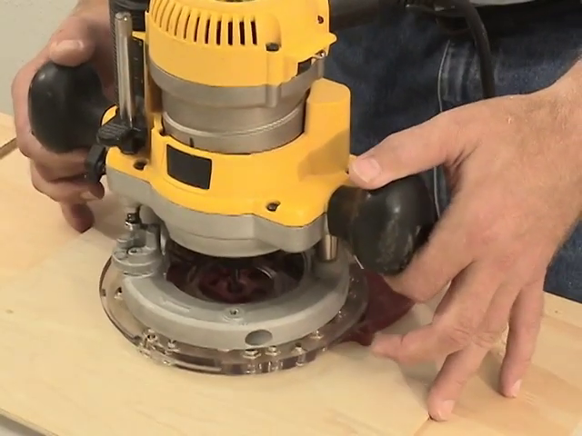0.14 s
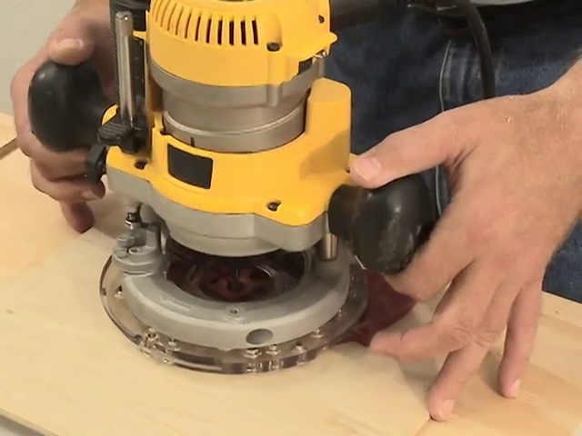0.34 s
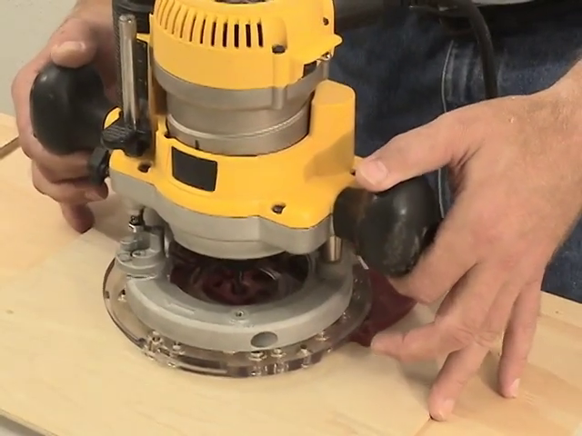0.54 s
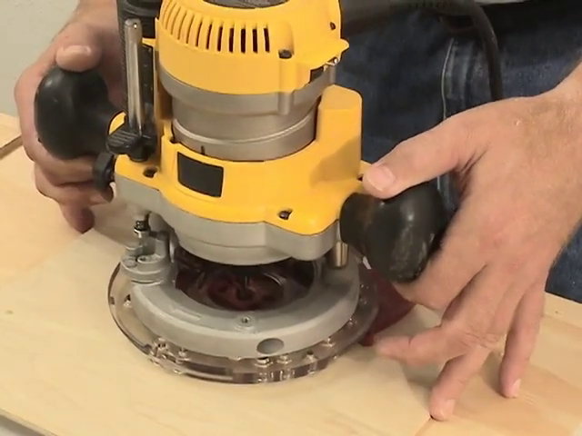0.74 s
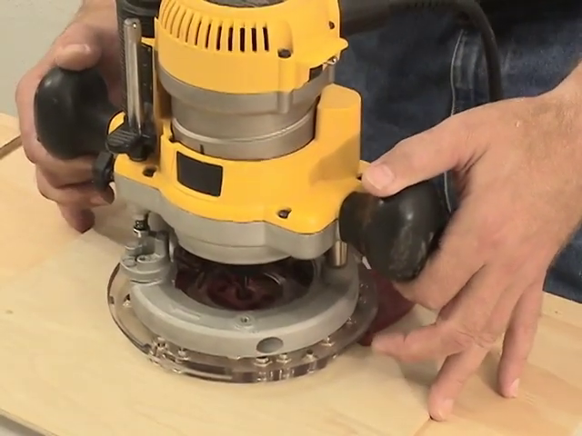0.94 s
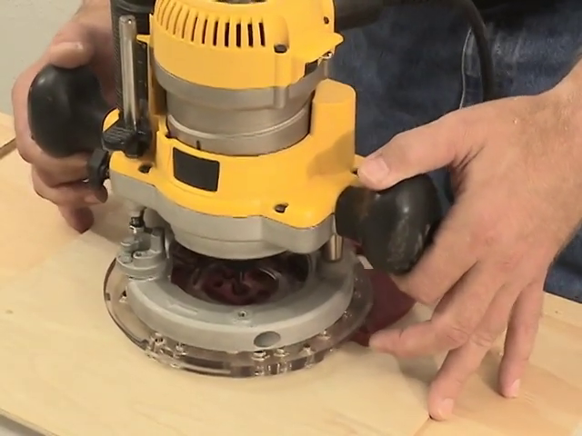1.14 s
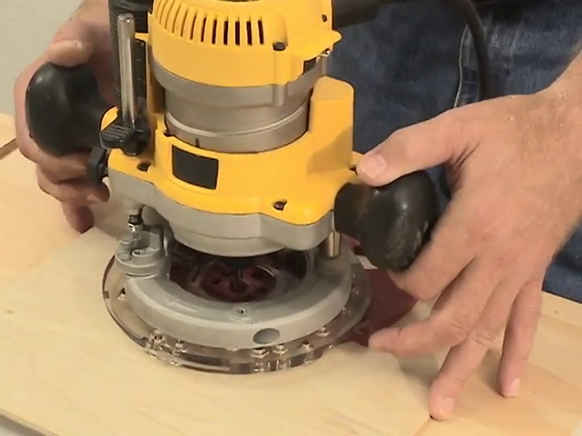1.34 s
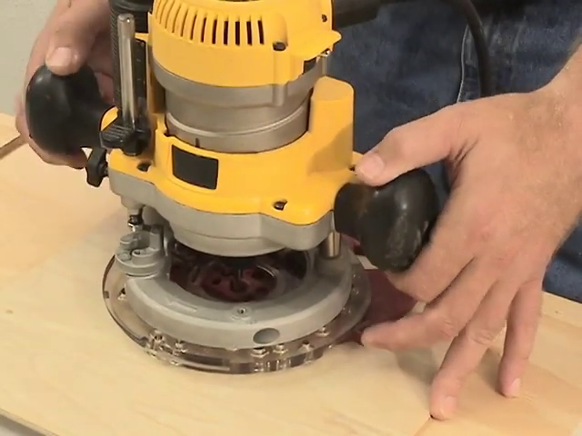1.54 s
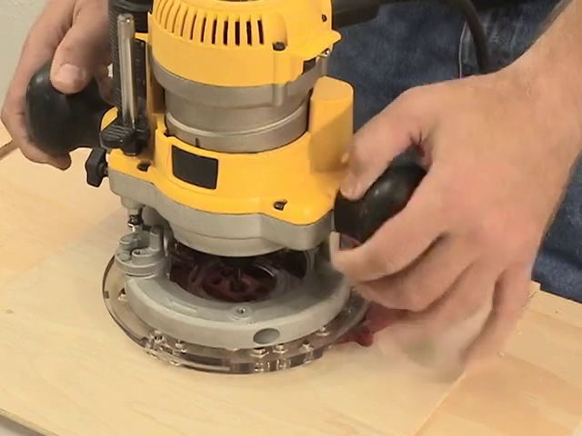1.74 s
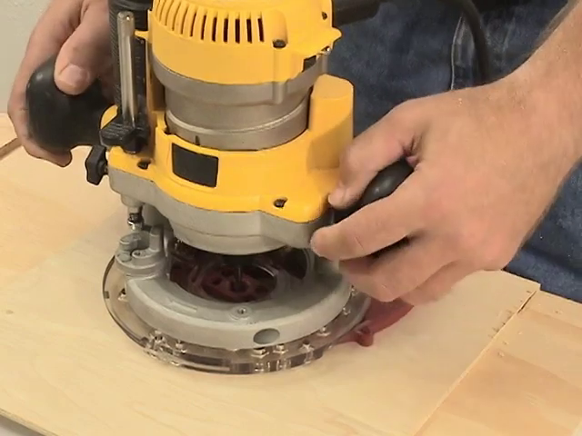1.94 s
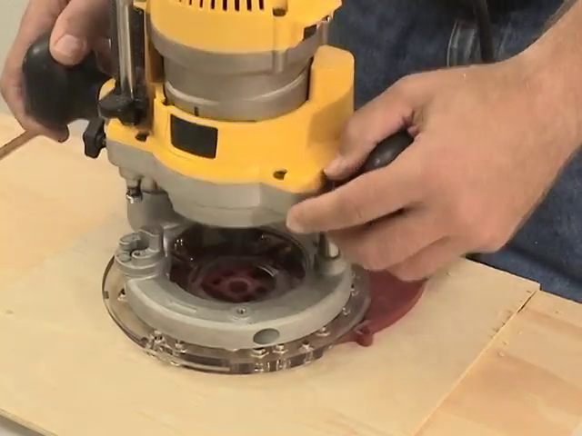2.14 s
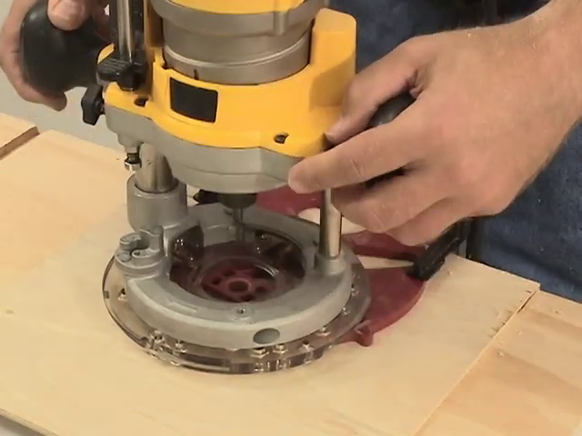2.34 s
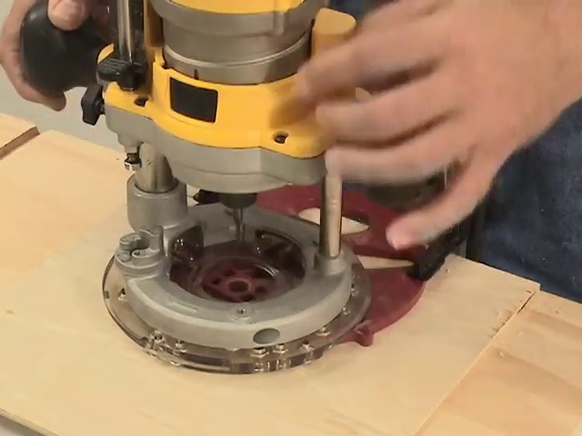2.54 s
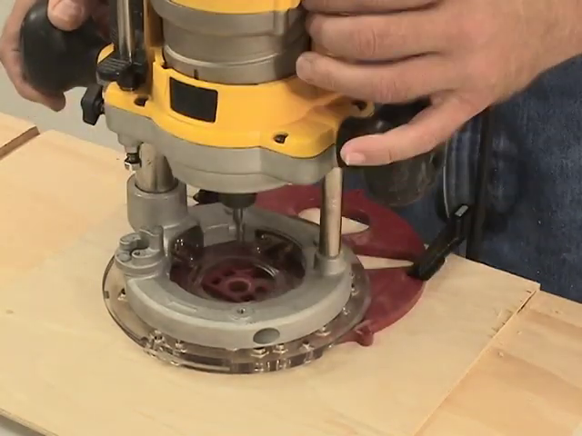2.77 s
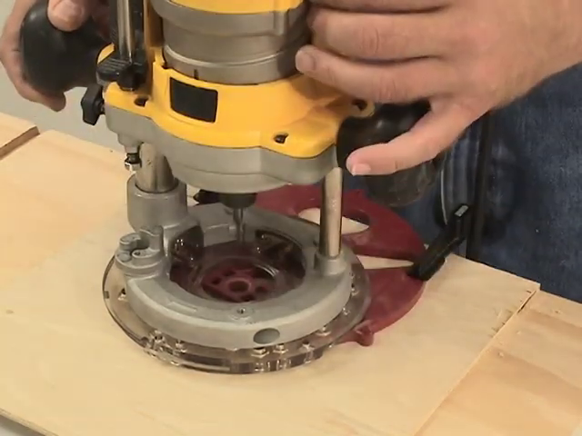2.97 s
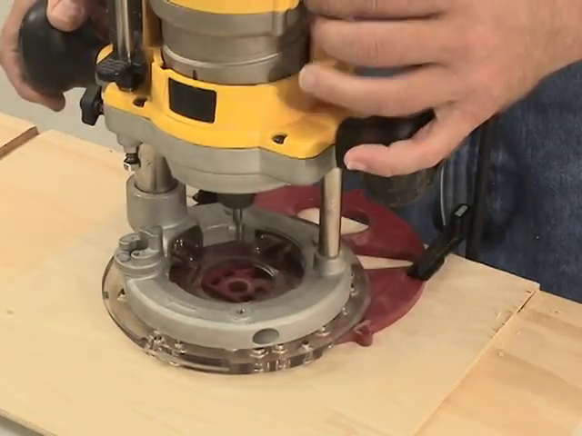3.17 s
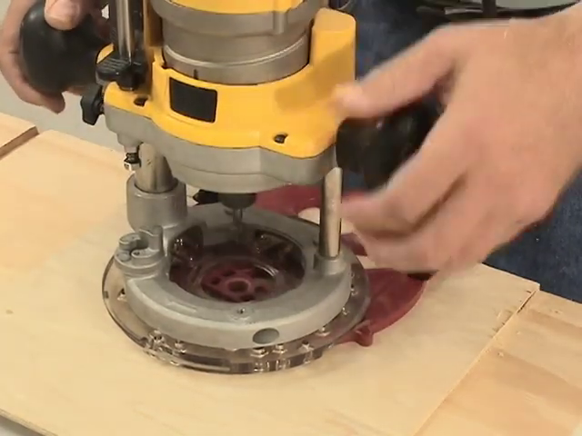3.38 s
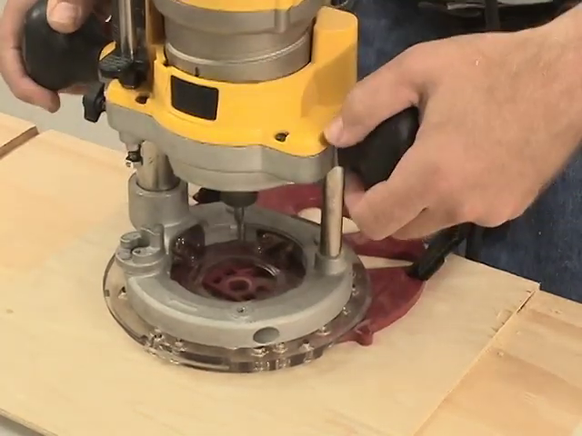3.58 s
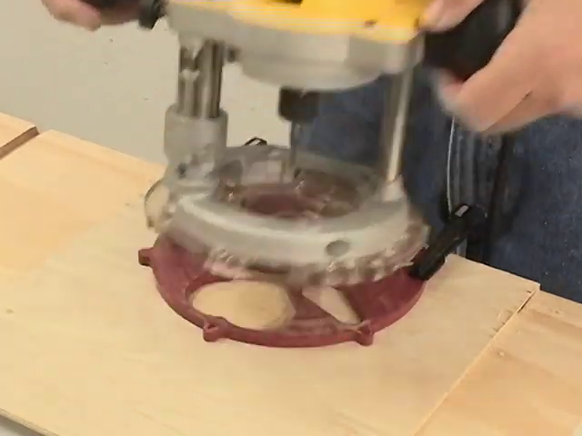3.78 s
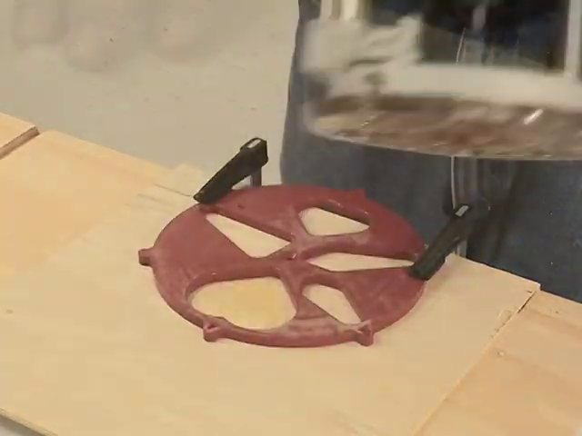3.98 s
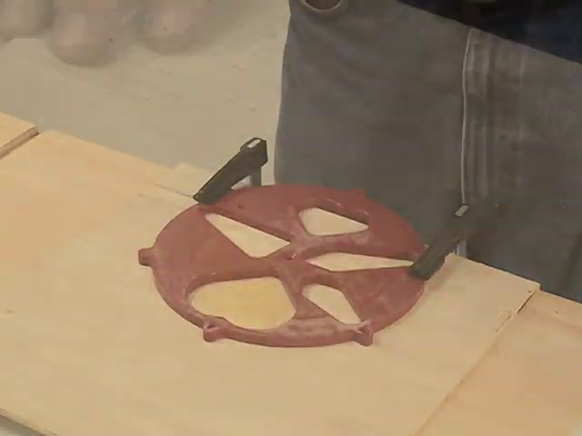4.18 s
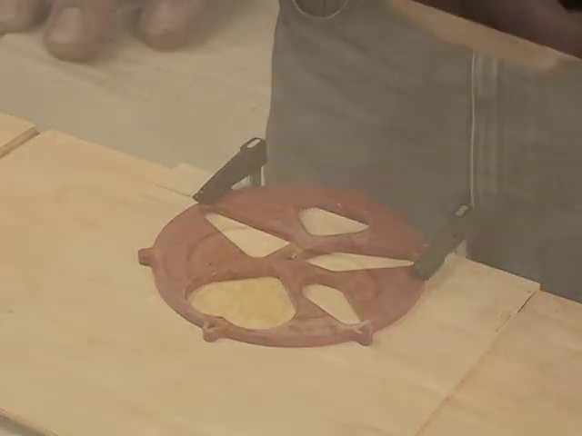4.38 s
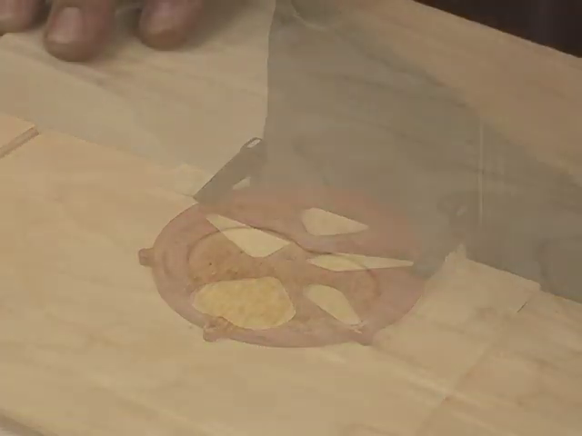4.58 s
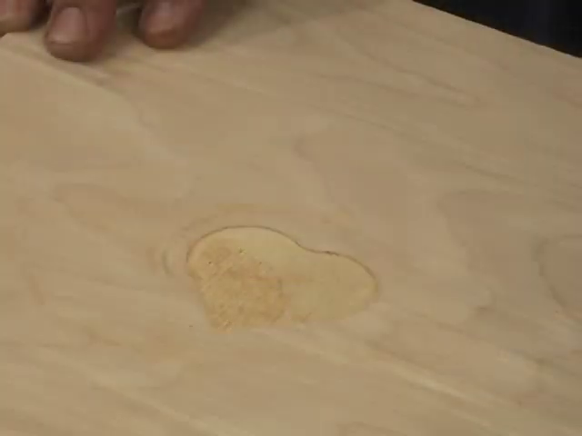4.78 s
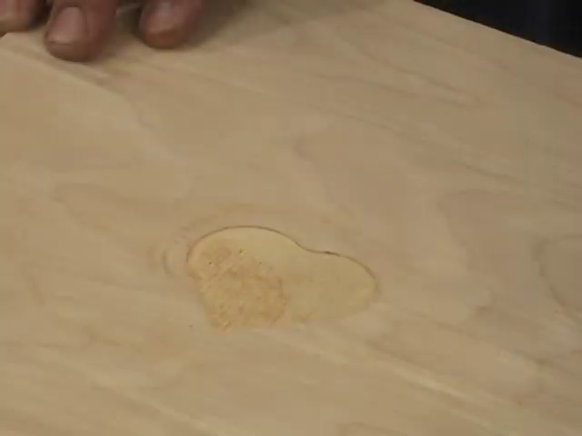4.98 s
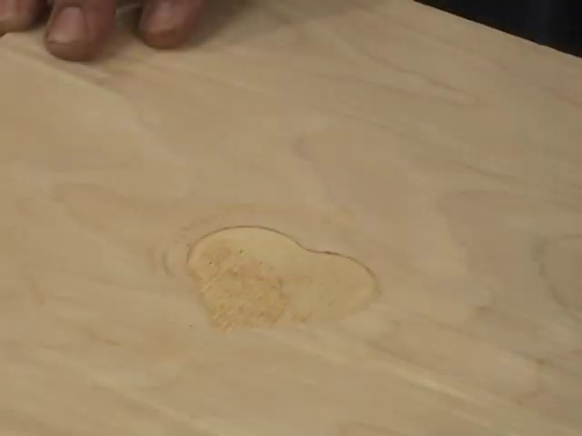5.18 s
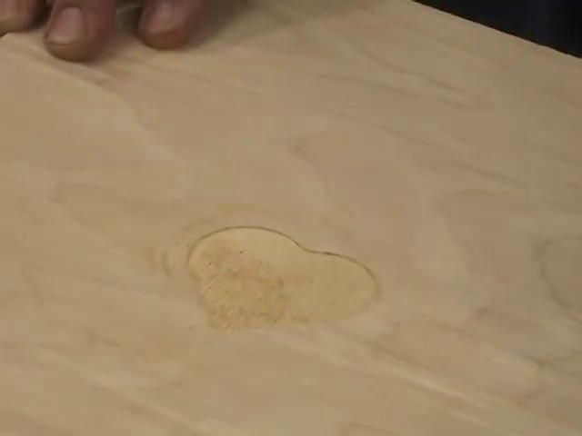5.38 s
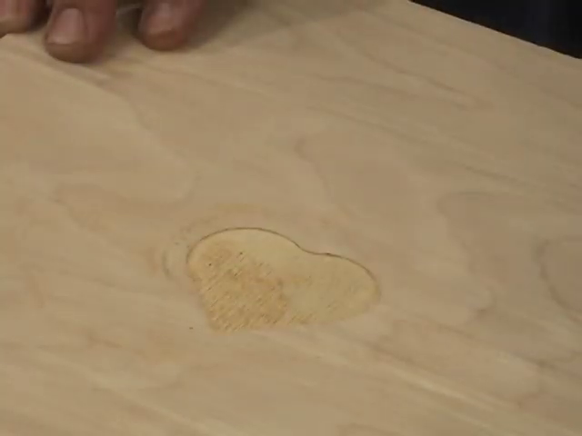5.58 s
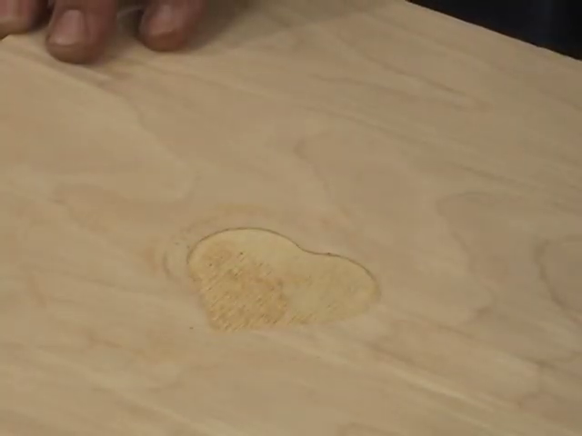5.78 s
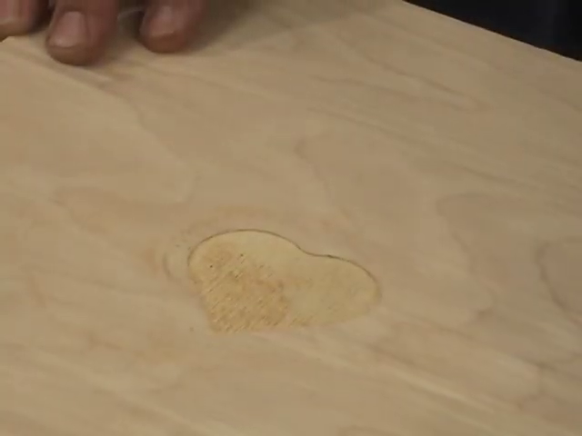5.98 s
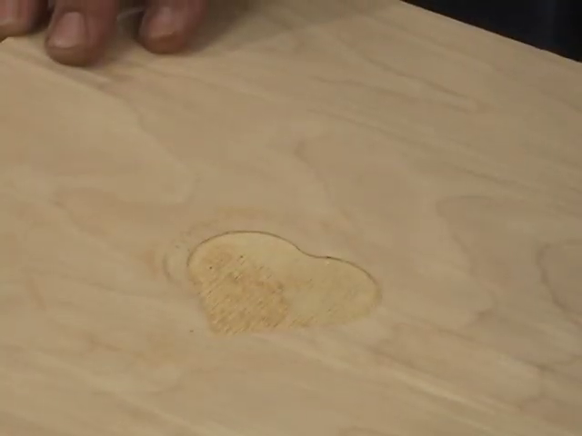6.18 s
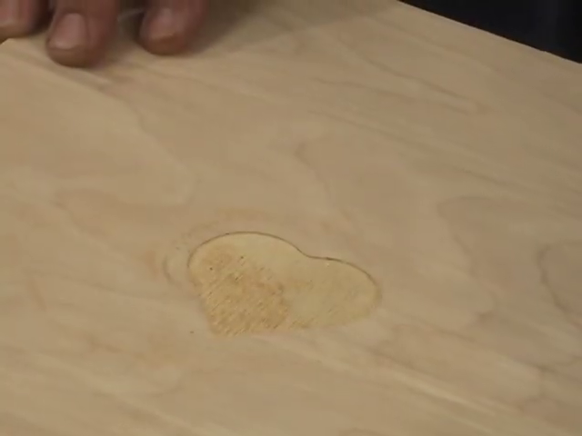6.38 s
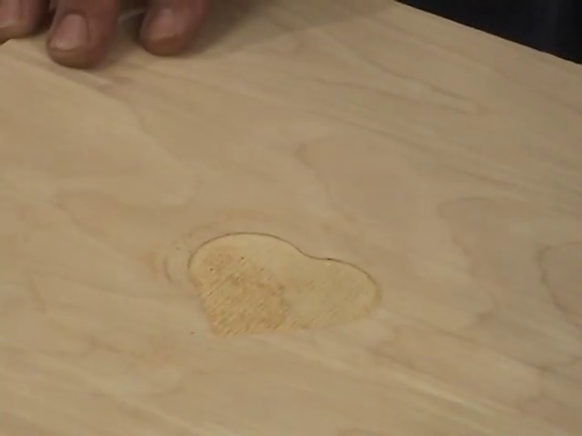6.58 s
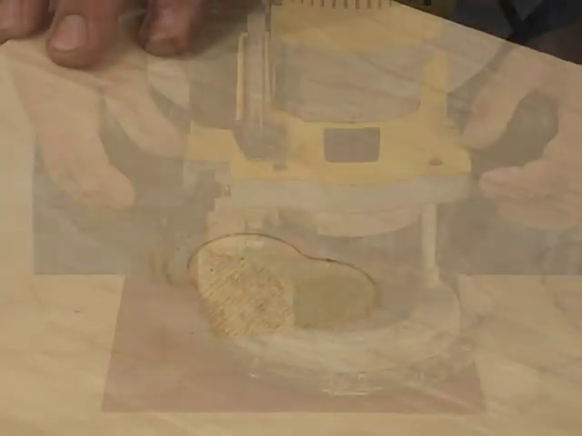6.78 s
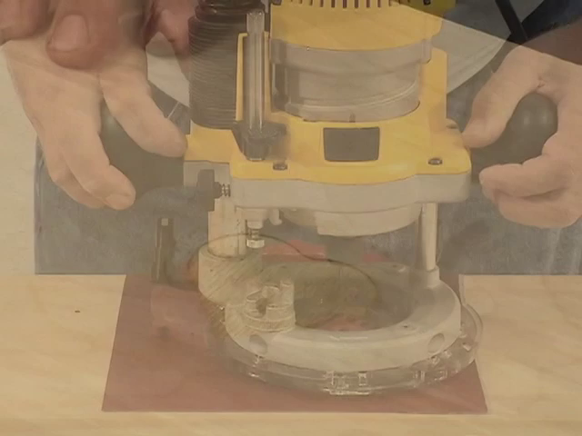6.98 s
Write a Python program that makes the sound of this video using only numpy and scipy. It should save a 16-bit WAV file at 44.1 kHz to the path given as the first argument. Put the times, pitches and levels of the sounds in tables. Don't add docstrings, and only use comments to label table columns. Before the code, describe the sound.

A steady, hissing electric motor roar fills the first three seconds, close to the microphone, with a thin tone beneath. Its colour opens when the machine is raised off the cut. Power stops, the tones glide down, and the roar hollows and vanishes just after four seconds. Quiet ventilation, mains hum and a very faint high whine follow, ended by a tiny scrape on wood.

```python
import sys
import numpy as np
from scipy import signal
from scipy.fft import rfft, irfft, next_fast_len
from scipy.io import wavfile
from scipy.ndimage import uniform_filter1d, map_coordinates

SR = 44100
rng = np.random.default_rng(int(sys.argv[2]) if len(sys.argv) > 2 else 0)


def inscribe(sig):
    pcm = np.round(np.clip(np.atleast_2d(sig).T, -1, 1) * 32767)
    wavfile.write(sys.argv[1], SR, pcm.astype(np.int16))


def volts(x):
    e = np.asarray(x, float) / 20
    return 10 ** e


N = 309580

SWITCH_OFF_S = 3.12
# (t/s, level/dB)
ROAR_LEVEL = [
    (0.0, -25),
    (2.07, -25),
    (2.22, -26),
    (3.33, -25.5),
    (3.64, -30.5),
    (3.82, -34.5),
    (4.0, -36.5),
    (4.23, -48),
    (4.33, -66),
]
# (t/s, 0 plunged / 1 raised / 2 lifted / 3 carried off)
HEIGHT_STAGES = [
    (0, 0),
    (2.1, 0),
    (2.21, 1),
    (3.6, 1),
    (3.77, 2),
    (3.88, 2),
    (3.98, 3),
    (4.4, 3),
]


def roar():
    # (f/Hz, level/dB per Hz)
    plunged_colour = [(150, -35), (330, -22.5), (640, -13), (1300, -11.5), (1830, -20.5), (2250, -11.5),
                      (2850, -7.5), (3150, -10.5), (4050, -11), (5000, -8.5), (6250, -0.5), (7100, -6),
                      (8300, -9), (10000, -19.5)]
    raised_colour = [(150, -31.5), (330, -23), (700, -12.5), (1200, -12.5), (1600, -18), (2200, -8.5),
                     (3250, -11), (3600, -6), (4300, -5.5), (5300, -7), (5800, -1.5), (7600, -2.5),
                     (9200, -11.5), (10000, -18.5)]
    lifted_colour = [(150, -37), (400, -16), (718, -7.5), (955, -10), (1340, -6), (1880, -10.5),
                     (2590, -6.5), (4470, -1.5), (5720, -4), (6860, -1.5), (7800, -5.5), (10000, -16)]
    away_colour = [(150, -28), (450, -11), (980, -8.5), (1270, -5.5), (1600, -10), (2220, -5), (2900, -3.5),
                   (4470, 0.5), (5720, -5.5), (6780, -5), (8000, -7.5), (10000, -15)]
    # (f/Hz, level/dB per Hz)
    hiss_colour = [(8500, -37), (9900, -11), (10500, 3), (12000, 0.5), (13200, 3), (14000, 0), (14700, -4),
                   (15300, -13), (15480, -18), (15620, -12), (15750, -22)]
    # (f/Hz, likeness 0-1, left minus right/dB, left leads/rad)
    machine_ports = [(300, .95, -3.4, .3), (1000, .87, -2, .4), (1900, .94, -.9, .1), (4000, .92, -1.3, .1),
                     (6200, .96, -2.9, .2), (7200, .89, -3.6, .2), (8600, .67, -3.2, 1.2),
                     (9300, .77, 0, 1.7), (10000, .6, 4.5, 2.2), (10700, .14, 9.3, 3), (11400, .32, 8, 4.9),
                     (12200, .45, 2, 5.1), (13800, .74, -2.1, 5.8), (15300, .97, -.2, 6.3)]
    # (t/s, delay/ms, strength 0-1)
    bench_echo = [
        (0, 0.53, 0.02),
        (3.62, 0.56, 0.02),
        (3.78, 0.72, 0.35),
        (4.05, .86, 0.3),
        (4.4, 1.12, 0),
    ]
    bench_coupling = (.93, .45, .3, .3)

    level_db, = curves(ROAR_LEVEL)
    height, = curves(HEIGHT_STAGES)
    end = round(ROAR_LEVEL[-1][0] * SR)
    air = 0
    for stage, colour in enumerate((plunged_colour, raised_colour, lifted_colour, away_colour)):
        share = np.sqrt(np.clip(1 - abs(height - stage), 0, 1))
        heard = np.flatnonzero(share)
        delays_s = rng.uniform(.004, .03, size=6)

        def response(hz):
            walls = 1 + 0.084 * np.exp(-2j * np.pi * np.outer(hz, delays_s)).sum(1)
            return closed(colour, hz) * ringing(hz, bench_coupling[stage]) * walls

        air = air + share * rush(response, machine_ports, patchy_db=0.84,
                                 start=heard[0], stop=min(heard[-1], end))

    body = filtered(air, lambda hz: 1 / (1 + (hz / 3300) ** 8))
    delay_ms, strength = curves(bench_echo)
    late = np.arange(N) - delay_ms * SR / 1000
    air = air + strength * np.array([np.interp(late, np.arange(N), low) for low in body])

    hiss = rush(lambda hz: closed(hiss_colour, hz), machine_ports, patchy_db=.5, stop=end)
    hiss_db = -22.0 - 2.8 * np.clip(height - 1, 0, 1)
    return volts(level_db + 0.2 * wobble(7.6)) * (air + volts(hiss_db) * hiss)


def ringing(hz, coupling):
    # (f/Hz, level/dB)
    bench_modes = [(525, -6), (607, -1), (690, 13.5), (762, 9.5), (845, 11), (930, 6.5), (998, 4.5),
                   (1105, 5), (1190, -27), (1246, -15), (1295, -0.5), (1400, 1.5), (1475, -2), (1560, 9.5),
                   (1660, 1), (1730, 6), (1850, -25), (1925, -10), (2245, -7.5), (2385, -13), (2880, -3),
                   (2968, -6), (3265, -21), (3645, -2.5), (4346, -2)]
    width_hz = 32
    peaks = 1 + sum(coupling * volts(db) / (1 + (2 * (hz - c) / width_hz) ** 2) for c, db in bench_modes)
    return peaks / uniform_filter1d(peaks, size=len(hz) // 60)


def whine():
    faint_orders = {18: (-28, .3), 24: (-38, 1), 29: (-45, 2.9)}
    # (from t/s, to t/s, gain/dB)
    grip_leans = [
        (.28, .42, 2.5),
        (.82, 0.998, 1.5),
        (1.324, 1.93, 3.5),
        (2.36, 3.176, 4.5),
        (3.38, 3.6, 1.5),
    ]
    blades = 19
    shaft_under_db, lift_loss_db, lean_ramp_s = -20, -16, .1

    turns = 2 * np.pi * np.cumsum(speed() + .1 * wobble(12)) / SR
    level_db, = curves(ROAR_LEVEL)
    lifted = np.clip(curves(HEIGHT_STAGES)[0] - 1, 0, 1)
    side = np.array([[1], [-1]])

    lean_db = sum(db * span(a, b, lean_ramp_s) for a, b, db in grip_leans)
    shaft_db = level_db + shaft_under_db + lift_loss_db * lifted + lean_db
    shaft = volts(shaft_db + 0.5 * wobble(24.6) - 1.76 * side) * np.sin(turns + .13 * side)

    blade_gain = swells() * volts(level_db + 1.6 + .8 * wobble(30) - 1.9 * side)
    blade = blade_gain * np.sin(blades * turns + (.5 + .12 * wobble(1.5)) * side)

    faint = sum(volts(level_db + db + 2 * wobble(5.9)) * np.sin(order * turns + lead * side)
                for order, (db, lead) in faint_orders.items())
    powered = np.arange(N) < SWITCH_OFF_S * SR
    alive = np.arange(N) < ROAR_LEVEL[-1][0] * SR
    return alive * np.sqrt(2) * (shaft + blade + powered * faint)


def speed():
    cold_hz, full_hz, settle_s = 430.6, 432.2, 1.6
    coast_s, ease = 4.3, 4
    t = np.arange(N) / SR
    powered = full_hz - (full_hz - cold_hz) * np.exp(-np.minimum(t, SWITCH_OFF_S) / settle_s)
    return powered / (1 + np.clip(t - SWITCH_OFF_S, 0, None) / (ease * coast_s)) ** ease


def swells():
    # (from t/s, to t/s, level under the roar/dB)
    blade_swells = [(.04, .23, -20), (.39, .67, -16), (.69, .97, -14), (.99, 1.27, -16),
                    (1.17, 1.68, -10.5), (1.69, 1.99, -12), (2.085, 2.33, -2.5), (2.3, 2.82, -14),
                    (2.82, 3.17, -11), (3.16, 3.56, -13), (3.56, 3.7, -11), (3.72, 3.93, -11),
                    (3.94, 4.35, -11)]
    rest_db, sharpness = -32, .6
    t = np.arange(N) / SR
    power = volts(2 * rest_db)
    for start, stop, db in blade_swells:
        lobe = abs(np.sin(np.pi * np.clip((t - start) / (stop - start), 0, 1))) ** sharpness
        power = power + (volts(db) * lobe) ** 2
    return np.sqrt(power)


def knocks():
    # (t/s, peak level/dB)
    lock_knocks = [
        (1.9, -49),
        (1.98, -53),
        (2.361, -60.5),
    ]
    out, t = np.zeros(N + SR), np.arange(SR // 4) / SR
    thud = np.sin(2 * np.pi * 118 * t) + 0.35 * np.sin(2 * np.pi * 165 * t)
    attack = 1 - np.exp(-t / .006)
    for s, db in lock_knocks:
        out[round(s * SR):][:len(t)] += volts(db - 60 * t / 0.26) * attack * thud
    return out[:N] * volts([[1.5], [-1.5]])


def scuff():
    # (t/s, level/dB, hold/s, t60/s)
    grit_catches = [
        (6.9015, -49, .023, .12),
        (6.937, -47, .003, .14),
        (6.95, -56, .02, .5),
    ]
    # (f/Hz, level/dB per Hz)
    grit_colour = [(1300, -28), (1800, -9), (2250, -1), (3000, -14), (3700, -6), (4500, 0), (5300, -8),
                   (6700, -12), (7800, -4), (8800, -11), (13000, -18), (14500, -27)]
    # (f/Hz, likeness 0-1, left minus right/dB, left leads/rad)
    scuff_ports = [(1900, .85, -1, .3), (5000, .88, 0, .4), (7500, .7, -3.7, 1.1), (9300, .6, 0, 2.2),
                   (11400, .4, 9, 3), (13000, .4, -1, 2.2)]
    attack_s = .002
    t = np.arange(N) / SR
    power = 0
    for s, db, hold, t60 in grit_catches:
        decay_db = 120 * np.clip(t - s - hold, 0, None) / t60
        power = power + volts(2 * db - decay_db) * np.clip((t - s) / attack_s, 0, 1) ** 2
    grit = rush(lambda hz: closed(grit_colour, hz), scuff_ports, patchy_db=-0.5,
                start=round(grit_catches[0][0] * SR))
    return np.sqrt(power) * volts(2.8 + .8 * wobble(250)) * grit


def workshop():
    # (f/Hz, level/dB per Hz)
    air_colour = [(20, -1), (38, -2.5), (68, -8), (119, -5.5), (220, -9.5), (324, -13), (500, -16),
                  (706, -15.5), (1130, -21.5), (1980, -27.5), (3180, -26), (7000, -37), (13900, -42.5),
                  (15700, -37)]
    # (f/Hz, likeness 0-1, left minus right/dB, left leads/rad)
    room_ports = [(30, .98, -7, 2.1), (70, .7, -2.5, 1.6), (120, .8, -4.2, 1), (210, .68, -3, .8),
                  (400, .3, -2.5, .5), (1000, .28, -2.4, .8), (2800, .58, -.9, .2), (5000, .57, -.8, .1),
                  (7500, .18, -1.5, .3), (9000, .08, 0, 0), (15000, .12, -.5, 0)]
    # (f/Hz, width/Hz, rms level/dB)
    room_drones = [(35.2, 10, -56), (120, 7, -62), (205.7, 13, -60), (328.9, 8, -64.5), (525, 5.8, -68.5),
                   (568, 6.8, -65.5)]
    # (f/Hz, rms level/dB)
    motor_tones = [(2444, -76), (3140, -77.5)]
    t = np.arange(N) / SR

    def lines(hz):
        return np.sqrt(sum(volts(2 * db) / w / (1 + (2 * (hz - c) / w) ** 4) for c, w, db in room_drones))

    air = volts(-48.5) * rush(lambda hz: closed(air_colour, hz), room_ports, patchy_db=0.5)
    drones = volts(-54.0) * rush(lines, room_ports, patchy_db=0.0)
    hum_phase = 2 * np.pi * 120.2 * t + .5 * wobble(3.11) + np.array([[.5], [-.5]])
    hum = volts(-58.5) * np.sin(hum_phase)
    far = sum(volts(db + 3 + 1.5 * wobble(2)) * np.sin(2 * np.pi * hz * t + wobble(3)) for hz, db in motor_tones)
    drum = drum_comb(15734.4, -85.5) + drum_comb(15666.2, -87)
    steady = drum * [[-1.3], [4.2]] + far

    level_db = workshop_level()
    return volts(level_db + 50.5) * (air + drones + hum) + volts(np.clip(level_db + 52, -30, 0)) * steady


def drum_comb(top_hz, top_db):
    spacing_hz, loss_db, ripple_db = 149.85, .5, 3.5
    t = np.arange(N) / SR
    out = 0
    for k in range(8):
        db = top_db - loss_db * k + ripple_db * np.cos(np.pi * (k + .5) / 2)
        out = out + volts(db) * np.sin(2 * np.pi * (top_hz - spacing_hz * k) * t + .8 * wobble(9))
    return out


def workshop_level():
    # from t/s, to t/s, gain/dB
    lock_fumble = (1.86, 2.43, 4.9)
    faint_db, free_db = -68, -48
    rise_from_s, rise_to_s, rise_bend = 3.47, 4.34, 0.76
    t = np.arange(N) / SR
    risen = np.clip((t - rise_from_s) / (rise_to_s - rise_from_s), 0, 1) ** rise_bend
    held = volts(faint_db + lock_fumble[2] * span(lock_fumble[0], lock_fumble[1], .05))
    return 20 * np.log10(held + (volts(free_db) - volts(faint_db)) * risen)


def rush(gain, ports, patchy_db, start=0, stop=N):
    size = stop - start
    m = next_fast_len(size)
    z = signal.stft(rng.standard_normal((2, size)), nperseg=512)[2]
    field = uniform_filter1d(rng.standard_normal(z.shape[1:]), size=8, axis=0)
    field = uniform_filter1d(field, size=14, axis=1)
    pair = rfft(signal.istft(z * volts(patchy_db * unit(field)), nperseg=512)[1], m)
    hz = np.fft.rfftfreq(m, 1 / SR)
    at, alike, lean_db, lead = np.transpose(ports)
    turn = np.arccos(np.interp(hz, at, alike)) / 2
    mid, side = gain(hz) * pair * [np.cos(turn), np.sin(turn)]
    half = volts(np.interp(hz, at, lean_db) / 2) * np.exp(.5j * np.interp(hz, at, lead))
    out = unit(irfft([(mid + side) * half, (mid - side) / half], m)[:, :size])
    return np.pad(out, ((0, 0), (start, N - stop)))


def closed(spectrum, hz):
    below, above = (spectrum[0][0] / 2, -90), (spectrum[-1][0] * 1.5, -70)
    return volts(along([below] + list(spectrum) + [above], hz))


def along(points, hz):
    f, v = np.transpose(points)
    return np.interp(np.log(hz + 1), np.log(f + 1), v)


def filtered(x, response):
    m = next_fast_len(x.shape[-1] + SR // 4)
    return irfft(rfft(x, m) * response(np.fft.rfftfreq(m, 1 / SR)), m)[..., :x.shape[-1]]


def curves(rows):
    s, *cols = np.transpose(rows)
    return [np.interp(np.arange(N) / SR, s, c) for c in cols]


def wobble(rate):
    coarse = np.arange(0, N + 32, 32)
    knots = rng.standard_normal(int(N * rate / SR) + 4)
    return np.interp(np.arange(N), coarse, map_coordinates(knots, [coarse * rate / SR]))


def span(start, stop, edge):
    t = np.arange(N) / SR
    return np.clip(np.minimum(t - start, stop - t) / edge + .5, 0, 1)


def unit(x):
    return x / np.sqrt(np.mean(x ** 2) + 1e-20)


def scene():
    return roar() + whine() + knocks() + scuff() + workshop()


def low_pass(x):
    return signal.sosfilt(signal.butter(12, 15770, fs=SR, output="sos"), x)


def record(dry):
    return low_pass(dry)


dry = scene()
out = record(dry)
inscribe(out)
```